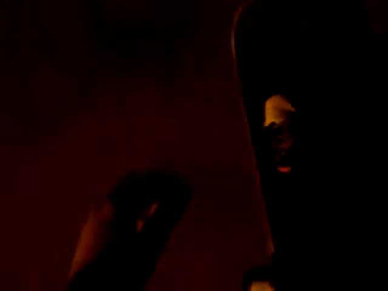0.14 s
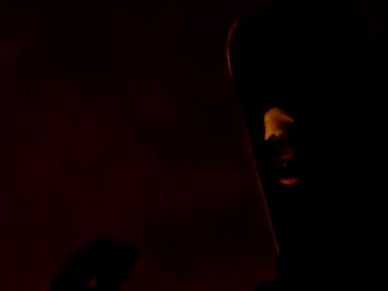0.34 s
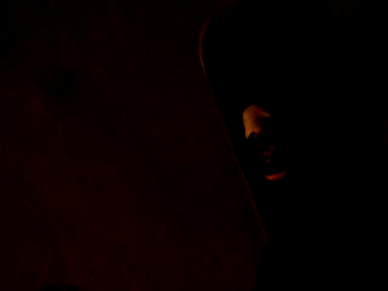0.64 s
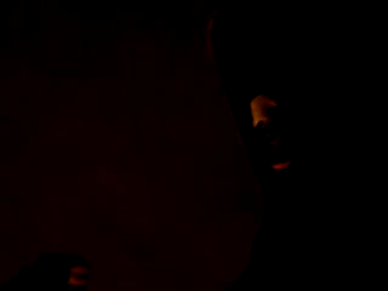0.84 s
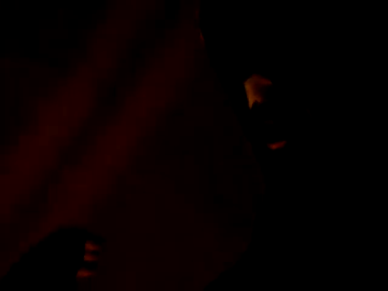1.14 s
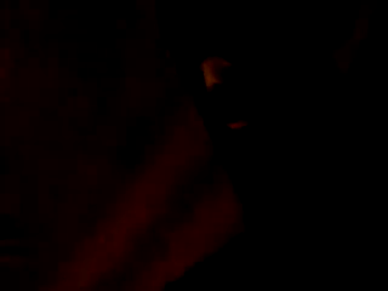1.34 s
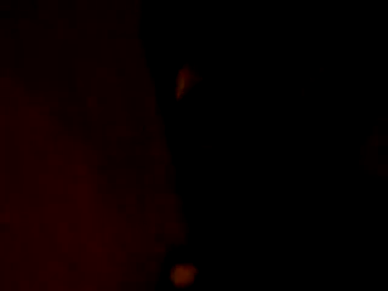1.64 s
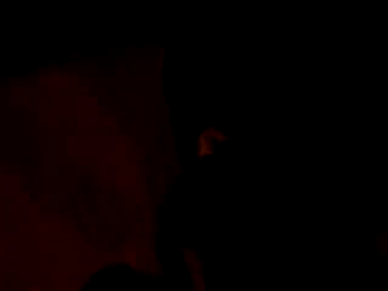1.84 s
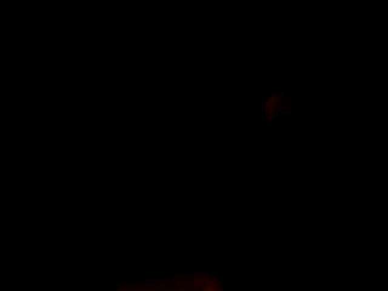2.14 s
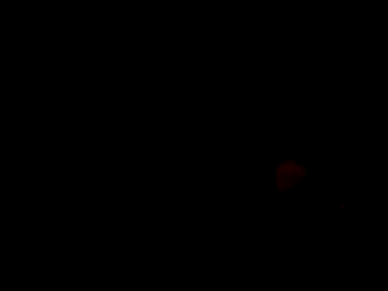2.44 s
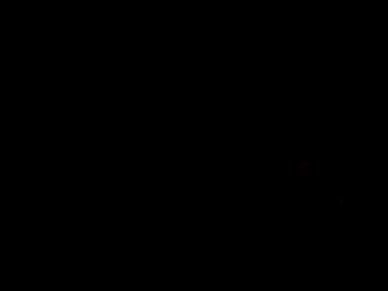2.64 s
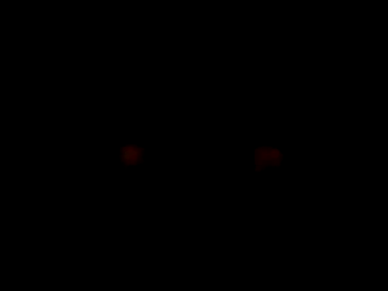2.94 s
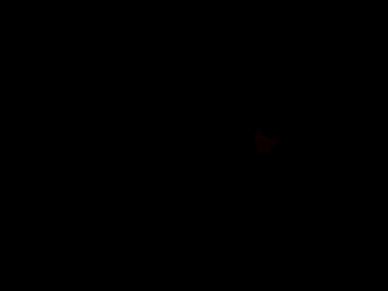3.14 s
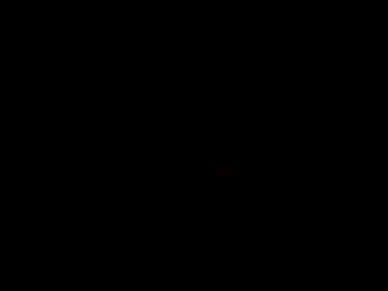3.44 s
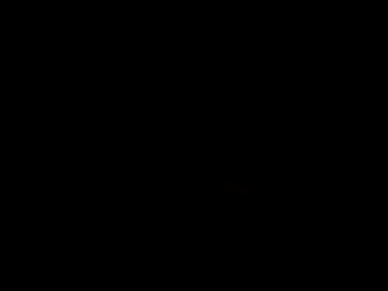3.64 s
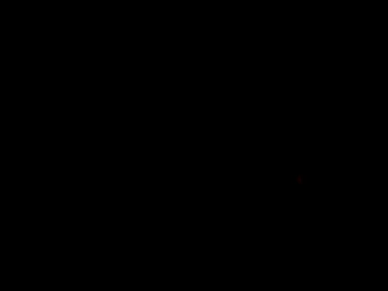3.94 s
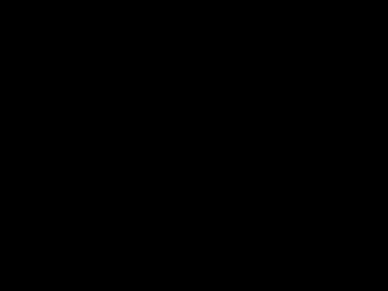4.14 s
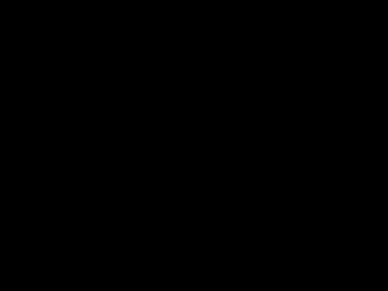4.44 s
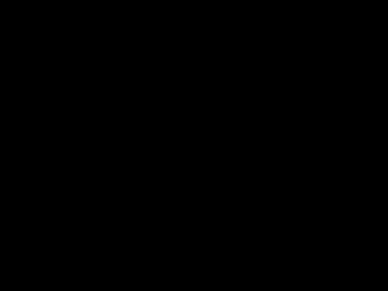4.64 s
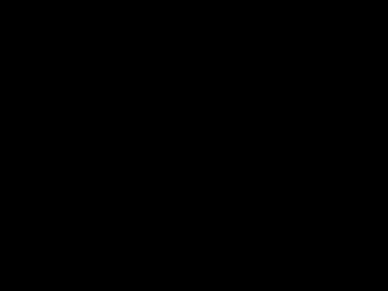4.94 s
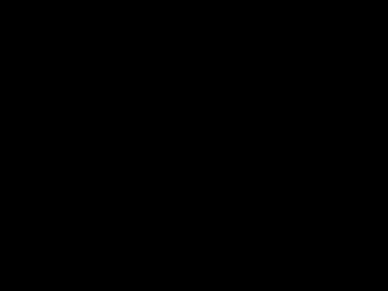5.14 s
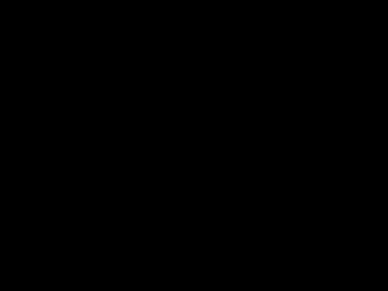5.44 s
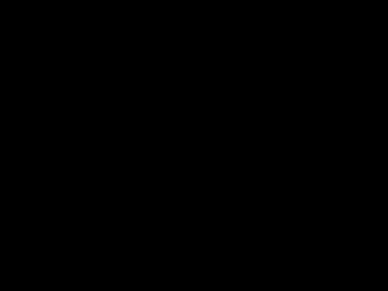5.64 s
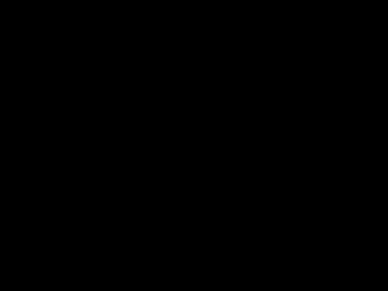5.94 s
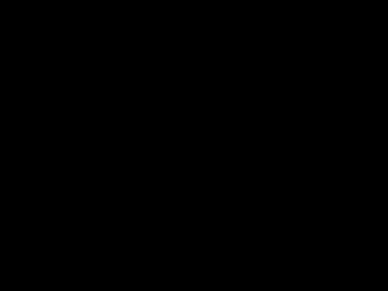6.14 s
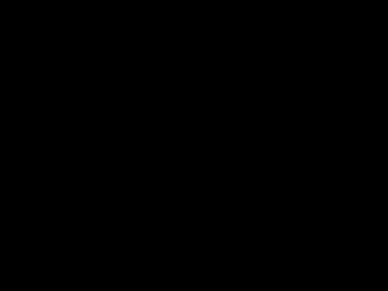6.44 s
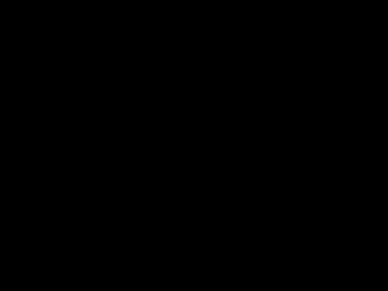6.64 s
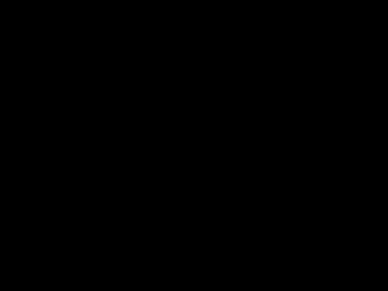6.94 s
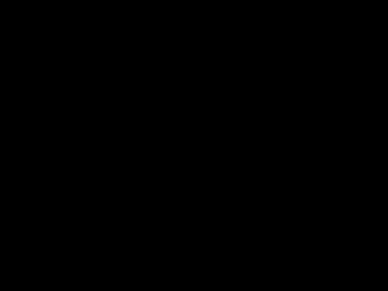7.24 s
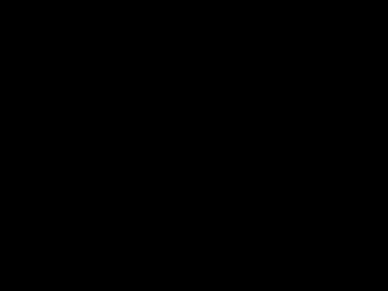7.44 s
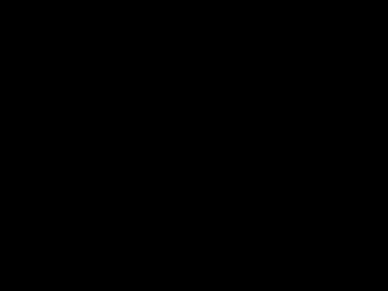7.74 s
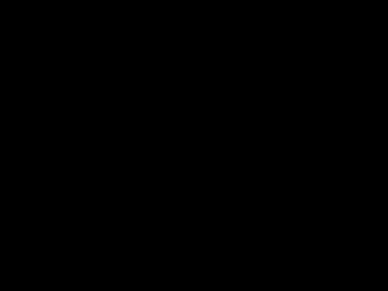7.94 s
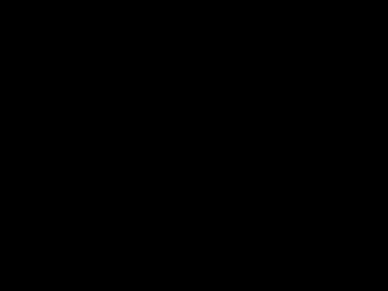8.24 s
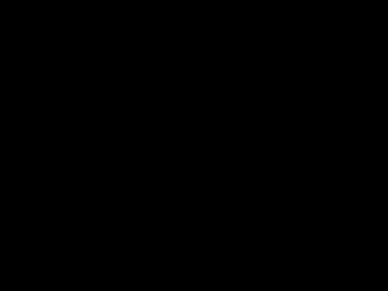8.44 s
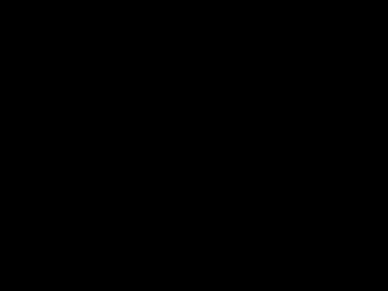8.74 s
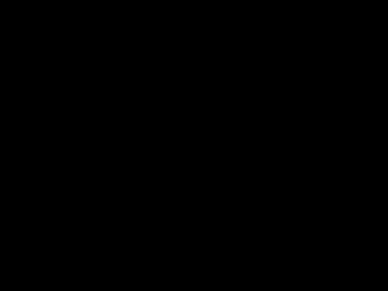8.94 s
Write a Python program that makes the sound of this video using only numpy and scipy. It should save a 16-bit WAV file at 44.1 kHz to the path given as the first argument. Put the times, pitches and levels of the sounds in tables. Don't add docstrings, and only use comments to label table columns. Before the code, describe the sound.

A skateboard rolls on a paved road, heard from a small camera held by the rider. Hollow wooden rumble with gritty truck ticks and frequent crack knocks leads into a dense clatter over pavers, a brief lull, then violent kerb bangs that overload. Smoother rolling follows, with a faint singing deck, and finally rougher rumble with pebbles clicks and wind thumps.

```python
import sys
import numpy as np
from scipy import signal
from scipy.io import wavfile
from scipy.ndimage import uniform_filter1d

SR = 44100
rng = np.random.default_rng(int(sys.argv[2]) if len(sys.argv) > 2 else 0)


def invert_db(level):
    return 10 ** (np.asarray(level, dtype=float) / 20)


def generate_wav(sig):
    pcm = np.round(np.clip(np.atleast_2d(sig).T, -1, 1) * 32767).astype(np.int16)
    wavfile.write(sys.argv[1], SR, pcm)


N = 400428
LEAD = 2048
PLATEAU_EDGE_S = 0.046

# [f/Hz, width/Hz, level/dB]
DECK_LOW = [(181, 63, -10.5), (250.6, 89, -5.5), (379, 116, -1.5)]
# [f/Hz, width/Hz, level/dB]
DECK = [(450, 130, -9.5), (574, 105, 5.5), (760, 91, -2), (819, 79, -3.5), (1000, 270, -12),
        (1330, 600, -34)]
# [f/Hz, width/Hz, level/dB]
TRUCKS = [(1830, 450, -27.5), (2260, 540, 16.5), (2670, 300, -8.5), (2530, 680, -1.5)]
# [f/Hz, width/Hz, level/dB]
BEARINGS = [(3960, 380, -1), (4530, 520, -5.5), (4700, 1400, -30.5)]


def level(x):
    return x / np.sqrt(np.mean(x ** 2))


def ring(x, hz, width_hz):
    pole = np.exp((2j * np.pi * hz - np.pi * width_hz) / SR)
    return signal.lfilter([1], [1, -pole], x).imag


def walk(rate_hz):
    hold = int(SR / rate_hz)
    steps = np.repeat(rng.standard_normal(N // hold + 1), hold)
    return 2.03 * uniform_filter1d(uniform_filter1d(steps, hold), hold)[:N]


def between(x, band_hz):
    return signal.sosfilt(signal.butter(5, band_hz, "bandpass", fs=SR, output="sos"), x)


def bumps(rows, width_s):
    t = np.arange(N) / SR
    return sum(db * np.exp(-((t - s) / width_s) ** 2 / 2) for s, db in rows)


def spans(rows, edge_s):
    t = np.arange(N) / SR
    return sum(height * np.clip(np.minimum(t - start, end - t) / edge_s + .5, 0, 1)
               for start, end, height in rows)


def driven(force, modes, own, flicker_db):
    force = level(np.r_[force[-LEAD:], force])
    total = np.zeros(N)
    for hz, width_hz, db in modes:
        shaken = ring(force + own * rng.standard_normal(N + LEAD), hz, width_hz)[LEAD:]
        total += invert_db(db + flicker_db * walk(15)) * width_hz * shaken
    return level(total)


def wind():
    # [t/s, level/dB]
    breeze = [(0.0, -25.5), (0.3, -36.5), (0.7, -27), (1.0, -37.5), (1.6, -27), (2.0, -32), (2.45, -36.5),
              (2.9, -28), (3.5, -23.5), (4.3, -21.5), (5.2, -24.5), (5.7, -22), (5.9, -33.5), (7.2, -36.5),
              (7.7, -25.5), (8.3, -22), (9.08, -26.5)]
    # [t/s, extra/dB]
    puffs = [(3.19, 10.5), (3.82, 15), (4.07, 10), (4.2, 10), (4.5, 9.5), (5.55, 11), (5.74, 9), (6.6, 5),
             (6.68, 22), (7.33, 16), (7.51, 13), (7.74, 5), (7.98, 13), (8.09, 10), (8.37, 7), (8.55, 3),
             (8.72, 14), (8.86, 8), (9.02, 6.5)]
    # [t/s, peak/dB, f/Hz]
    gusts = [(0.391, 0, 159), (2.491, -25, 56.5), (3.697, 15.5, 144.3), (3.796, -8, 95.2),
             (4.179, -18, 50.8), (4.483, -8, 71), (5.541, 2.5, 105), (5.587, -0.5, 147),
             (6.588, -8.5, 64.3), (6.667, -15, 74), (6.709, -12, 39.4), (7.308, -12, 128.5),
             (7.492, -15.5, 160), (7.735, -10.5, 137.6), (7.967, -1.5, 59.6), (8.073, -5, 42.4),
             (8.17, -2, 60), (8.299, 4, 144), (8.353, -1, 80.4), (8.378, -6.5, 74), (8.699, 6, 140.5),
             (8.845, -0.5, 46), (8.879, -23.5, 75.4)]
    # [f/Hz, width/Hz, level/dB]
    rumble = [(32, 82, -0.15), (83, 100, -1.7)]
    wind_db = np.interp(np.arange(N) / SR, *np.transpose(breeze)) + bumps(puffs, width_s=0.032)
    lumps = invert_db(.6 * walk(14)) * rng.standard_normal(N)
    out = invert_db(wind_db - 1.5) * driven(lumps, rumble, own=.7, flicker_db=.8)
    t = np.arange(SR // 8) / SR
    for s, db, hz in gusts:
        slap = invert_db(db + 3.0) * t * hz * np.exp(-t * hz / 0.81) * np.cos(2 * np.pi * hz * t)
        out[int(s * SR):][:len(t)] += slap[:N - int(s * SR)]
    return signal.sosfilt(signal.butter(3, 190, fs=SR, output="sos"), out)


def hum(rows, modes):
    envelope = spans([(start, end, invert_db(db)) for start, end, db in rows], PLATEAU_EDGE_S)
    return envelope * driven(rng.standard_normal(N), modes, own=0.39, flicker_db=1.0)


def leaning():
    # [start/s, end/s, level/dB]
    leans = [
        (0.0, 0.201, -20),
        (3.048, 3.4, -19),
        (4.0, 4.298, -29),
        (7.198, 7.499, -17.5),
        (7.576, 8.096, -20.5),
        (8.2, 8.463, -19),
        (8.818, 8.956, -22.5),
    ]
    # [f/Hz, width/Hz, level/dB]
    lean_mode = [(341, 36, 0)]
    return hum(leans, lean_mode)


def fine_asphalt():
    # [start/s, end/s, level/dB]
    fine = [
        (4.7, 5.3, -31.5),
        (5.62, 6.55, -20.5),
        (6.6, 7.05, -29.5),
    ]
    # [f/Hz, width/Hz, level/dB]
    sing = [(860, 87, 1), (410, 68, -1.5), (1310, 210, -15)]
    return hum(fine, sing)


def knocks():
    # [t/s, blow/dB, crack re blow/dB]
    cracks = [(0.028, -26, -28), (0.05, -11.5, -18), (0.144, -10, -12), (0.169, -4, -23.5),
              (0.227, -6.5, -19), (0.296, -12, -27), (0.465, -6, -28), (0.514, -15, -10), (0.535, -8, -25),
              (0.562, -6, -29.5), (0.6, 1.5, -20.5), (0.638, -8, -23), (0.672, -8.5, -27),
              (0.732, -8, -20.5), (0.75, -2, -23.5), (0.904, -5.5, -31), (0.985, -14, -14),
              (1.113, -7, -22), (1.15, -3.5, -24), (1.283, -18, -13), (1.376, -1.5, -20), (1.446, -15, -13),
              (1.488, -0.5, -20), (1.5, -7.5, -12), (1.565, -4, -11.5)]
    # [t/s, blow/dB, crack re blow/dB]
    pavers = [(1.633, 0, -20.5), (1.663, 6, -26.5), (1.687, 3, -21.5), (1.709, 0, -16.5),
              (1.721, 5.5, -21.5), (1.772, -7.5, -21.5), (1.799, -4, -10.5), (1.814, -7, -25.5),
              (1.822, -1.5, -24.5), (1.834, -0.5, -14), (1.861, -1, -22.5), (1.905, -1.5, -18.5),
              (1.914, -3.5, -22), (1.933, -11, -18), (1.948, -2, -31.5), (1.954, -3, -31.5),
              (1.987, -6, -30), (2.032, -12.5, -36), (2.076, -8, -27), (2.092, -6, -24.5),
              (2.106, 2, -25.5), (2.129, -5, -20), (2.164, -2.5, -26.5), (2.176, -11, -21),
              (2.199, -7, -29), (2.248, -8.5, -20.5), (2.278, -18.5, -26), (2.344, -6.5, -25),
              (2.36, -5, -14), (2.391, -12, -14)]
    # [t/s, blow/dB, crack re blow/dB]
    kerbs = [(3.128, -9.5, -19), (3.151, -6.5, -16.5), (3.186, -2.5, -21), (3.249, -7, -36),
             (3.271, -10, -25), (3.305, 8, -29), (3.564, -12.5, -12.5), (3.687, -6, -23), (3.719, 7, -11.5),
             (3.76, 9, -24), (3.789, -1.5, -13), (3.892, -1, -27.5), (3.909, 2, -19.5), (3.918, 5, -8),
             (4.023, -5, -19), (4.039, -3.5, -28), (4.06, -8, -26), (4.221, -6.5, -27), (4.23, 3, -36.5),
             (4.269, 4.5, -18), (4.354, -6, -21), (4.393, -9, -26), (4.604, -10, -15)]
    # [t/s, blow/dB, crack re blow/dB]
    pebbles = [(6.359, -15, -11), (6.558, -6, -32), (7.221, -3, -8.5), (7.311, -15.5, -8),
               (7.344, -12, -19), (7.39, -21, -19), (7.524, -16, -27), (8.079, -9, -15),
               (8.137, -15.5, -27.5), (8.208, -10, -13), (8.739, -5, -29), (8.796, -7, -21.5),
               (8.838, -6, -17), (8.881, -7.5, -25)]
    # [f/Hz, width/Hz, level/dB]
    risers = [(1300, 210, 1.5), (1710, 260, -4)]
    # (knocks, thud re blow/dB, rattle t60/s)
    paving = [(cracks, -4.5, .03), (pavers, -17.5, 0.041), (kerbs, 0, 0.027), (pebbles, -4.5, 0.011)]
    out = np.zeros((2, N + SR // 4))
    t = np.arange(SR // 8) / SR
    for s, blow_db, crack_db, thud_db, t60_s in [(*row, *shared) for rows, *shared in paving for row in rows]:
        bounces = rng.standard_normal(len(t)) * (rng.random(len(t)) < .1)
        push = (t == 0) + 0.33 * bounces * invert_db(-60 * t / max(t60_s, .004))
        chatter = push + 0.15 * bounces * invert_db(-60 * t / 0.095)
        # (0 wood or 1 metal, modes, level/dB, damping factor)
        parts = [(0, DECK_LOW, thud_db - 11.5, 3.8), (0, DECK, -7.5, 1.6),
                 (1, TRUCKS, crack_db - 16.5, 0.52), (1, BEARINGS, crack_db - 15, 1.3), (1, risers, -19, 1)]
        for k, modes, part_db, damping in parts:
            for (hz, width_hz, db), chance in zip(modes, rng.standard_normal(len(modes))):
                gain = invert_db(blow_db + part_db + 0.78 * db + 0.5 * chance)
                out[k, int(s * SR):][:len(t)] += gain * ring((push, chatter)[k], hz, damping * width_hz)
    return out[:, :N]


def grain(rate_hz, scatter_db):
    when, size, sign = rng.random((3, N))
    push = np.sign(.75 - sign)
    return (when < rate_hz / SR) * invert_db(-scatter_db * np.log(size + 0.037)) * push


def rolling():
    # [t/s, road contact/dB, rider's load on low modes/dB, wheel spin/dB]
    roll = [(0.0, -12.5, -14.5, -53), (0.3, -18.5, -19.5, -55), (1.0, -19, -18.5, -53.5),
            (1.37, -20, -19.5, -54.5), (1.76, -20.5, -27, -61.5), (2.05, -32, -30.5, -69),
            (2.55, -34.5, -34, -63), (2.8, -20, -21.5, -54.5), (3.05, -23, -17.5, -59),
            (3.452, -22.5, -21.5, -49), (3.901, -14.5, -15, -53), (4.452, -20, -22, -57.5),
            (5.401, -19, -22.5, -57), (5.8, -18, -26, -61), (6.55, -17, -26.5, -60.5),
            (7.1, -20, -24.5, -52.5), (7.35, -17.5, -19, -50.5), (9.08, -18, -16, -55.5)]
    # [start/s, end/s, extra/dB]
    slams = [(1.692, 1.679, 14), (1.722, 1.736, 9.5), (3.286, 3.321, 11), (3.684, 3.736, 18),
             (3.744, 3.768, 7.5), (3.777, 3.81, 7.5), (3.898, 3.942, 16), (4.039, 4.073, 11.5),
             (4.217, 4.268, 4.5), (4.269, 4.275, 17), (7.975, 7.994, 5), (8.045, 8.19, 3),
             (8.265, 8.304, 3), (8.873, 8.918, 0.5)]
    # [start/s, end/s, extra/dB]
    patches = [
        (1.498, 1.726, 4),
        (2.109, 2.3, 9),
        (3.06, 3.29, 6),
        (7.255, 7.405, 2.5),
        (7.6, 7.95, 0.5),
        (7.97, 8.21, 3.5),
        (8.05, 8.19, -0.5),
        (8.47, 8.66, -1),
        (8.751, 8.924, 4.5),
    ]
    # [t/s, extra hiss/dB]
    scrubs = [
        (5.55, 10.5),
        (7.08, 6.5),
        (7.13, 8),
        (7.525, 10.5),
        (8.76, 8.5),
    ]
    # [start/s, end/s, grit change/dB]
    swept = [
        (2.45, 3.05, 0),
        (4.65, 5.5, -4.5),
        (5.62, 6.62, 1),
        (6.7, 7.15, -2),
        (8.04, 8.2, 1),
        (8.25, 8.7, -1),
    ]
    t = np.arange(N) / SR
    s, *columns = np.transpose(roll)
    contact_db, load_db, spin_db = (np.interp(t, s, c) for c in columns)
    patch_db = spans(patches, edge_s=.04)
    deck_db = contact_db + patch_db
    grit_db = contact_db - 24.5 + 1.1 * patch_db + spans(swept, PLATEAU_EDGE_S)
    hiss_db = spin_db + 1.9 * patch_db + bumps(scrubs, width_s=.02)
    slam_db = sum(db * np.clip((t - start) / 0.0037, 0, 1) * np.clip((end - t) / 0.013 + 1, 0, 1)
                  for start, end, db in slams)
    roughness = invert_db(.8 * walk(40))
    stones = roughness * grain(900, 1.7)
    grit = roughness * grain(2200, 4.8) + 0.24 * stones
    wood = (invert_db(load_db + 1.0 * slam_db) * driven(stones, DECK_LOW, own=0.83, flicker_db=-0.03)
            + invert_db(deck_db + 0.79 * slam_db) * driven(stones, DECK, own=1.0, flicker_db=0.76))
    metal = (invert_db(grit_db + 0.6 * slam_db) * driven(grit, TRUCKS, own=0.51, flicker_db=0.83)
             + invert_db(hiss_db + 1.1 * slam_db) * driven(grit, BEARINGS, own=0.6, flicker_db=0.0))
    return np.array([wood, metal])


def scene():
    wood, metal = knocks() + rolling()
    wood = wood + leaning() + fine_asphalt()
    deck = between(np.r_[wood[LEAD:0:-1], wood], (136.6, 1397))[LEAD:]
    return (deck + between(metal, (1250, 7000)) + wind())[None]


def roll_off(x):
    return signal.sosfilt(signal.butter(12, 15870, fs=SR, output="sos"), x)


def record(dry):
    # [low/Hz, high/Hz]
    thin_bands = [(2550, 3300), (4850, 5500)]
    overload, ceiling = 0.72, .705
    x = np.clip(dry, -overload, overload)
    slot = signal.cheby2(4, 27, (3235, 3590), "bandstop", fs=SR, output="sos")
    x = signal.sosfiltfilt(slot, x, padtype="even")
    x = signal.sosfiltfilt(signal.ellip(7, .2, 40, 5330, fs=SR, output="sos"), x, padtype="even")
    for band_hz in thin_bands:
        band = signal.sosfiltfilt(signal.butter(6, band_hz, "bandpass", fs=SR, output="sos"), x)
        log_power = np.log(uniform_filter1d(band ** 2, size=260) + 1e-12)
        starved = log_power < uniform_filter1d(log_power, size=1200) - 1.0
        x = x - band * uniform_filter1d(1. * starved, size=160)
    mix = np.clip(x, -ceiling, ceiling)
    return roll_off(mix)


dry = scene()
out = record(dry)
generate_wav(out)
```